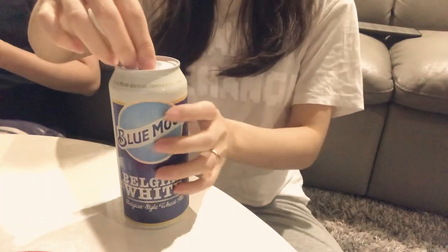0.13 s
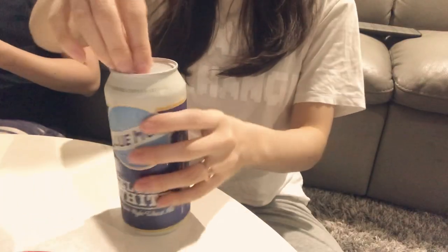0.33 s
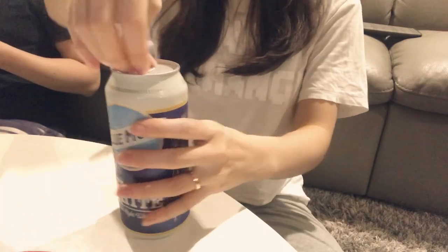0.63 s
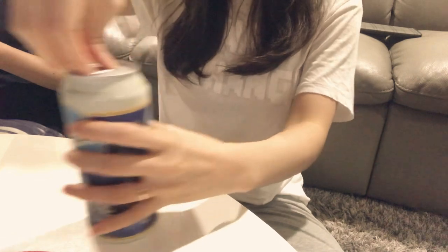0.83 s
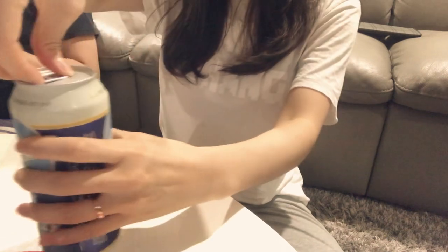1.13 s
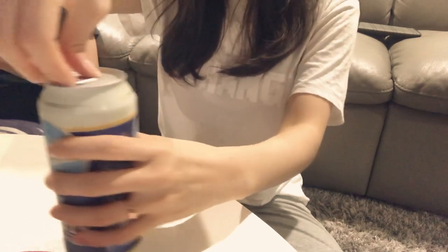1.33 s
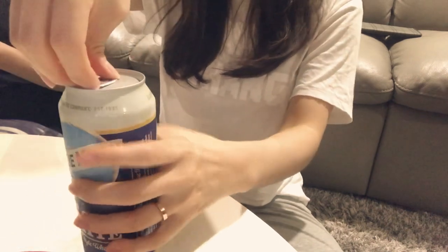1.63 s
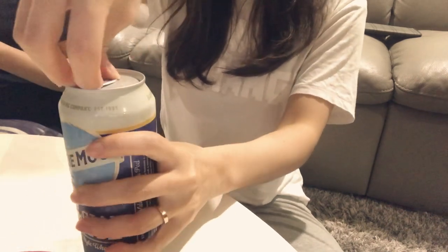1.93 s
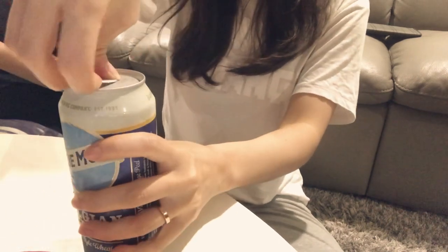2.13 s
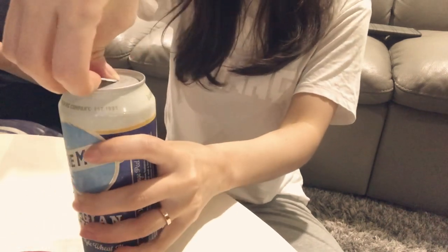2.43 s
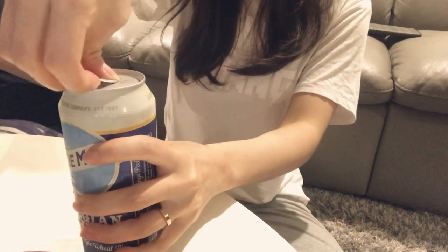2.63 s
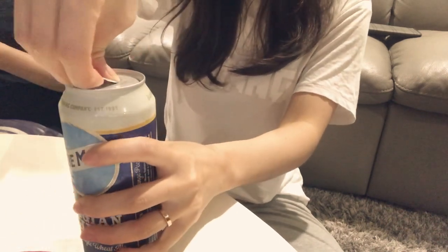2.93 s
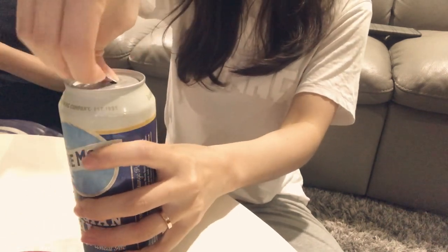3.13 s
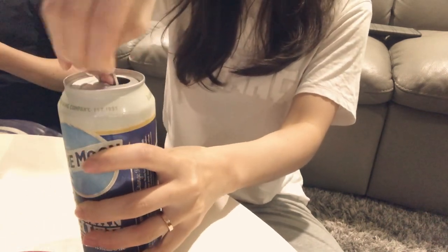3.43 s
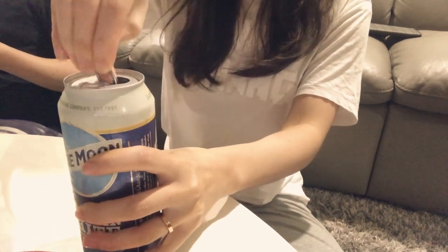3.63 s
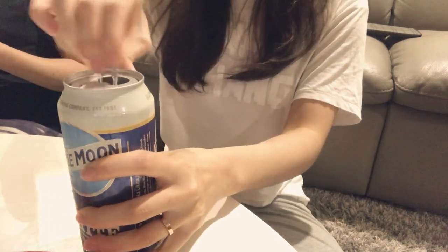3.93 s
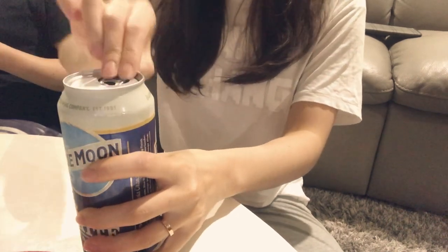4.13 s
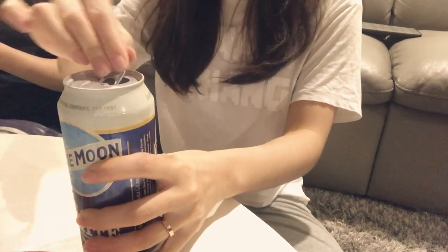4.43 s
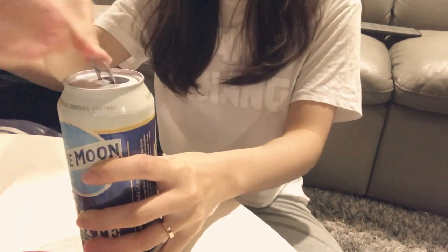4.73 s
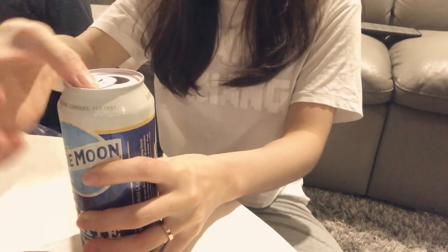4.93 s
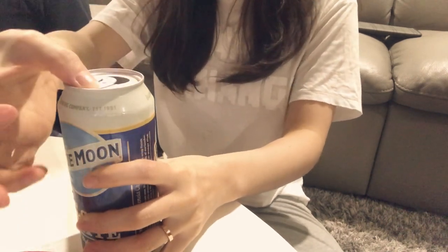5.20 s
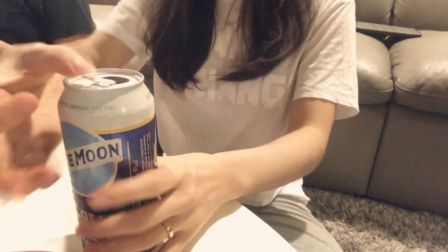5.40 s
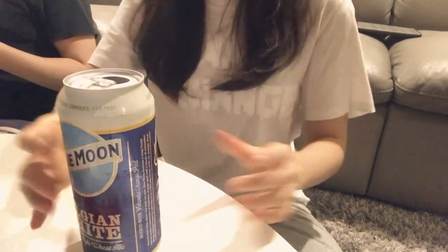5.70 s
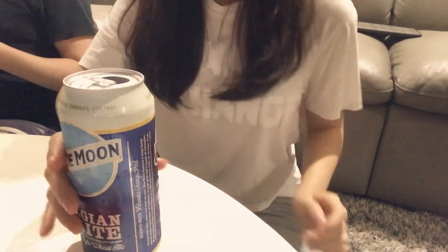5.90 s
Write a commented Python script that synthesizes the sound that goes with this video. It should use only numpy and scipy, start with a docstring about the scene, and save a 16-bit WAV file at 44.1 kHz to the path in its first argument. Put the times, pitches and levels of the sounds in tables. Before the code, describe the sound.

A full metal drink can knocks and slides on a table, its lid cracks, gas hisses briefly, then it tears open with a ringing metallic pop.

```python
"""A can scrapes and knocks on a table, is handled, and is then opened close by in a quiet living room.
The stiff lid cracks and sings, and gas hisses through the slit as noise shaped by a bright jet spectrum.
The flap tears open and the thin shell rings as damped modes; then the flap scrapes down inside.
The tab ticks and creaks as it is folded back, and skin rubs the can as the hands let go.
Blows excite resonant bodies, friction is a train of tiny slips, and walls add a tail of dense modes."""
import sys
import numpy as np
from scipy import signal
from scipy.io import wavfile
from scipy.ndimage import uniform_filter1d

SR = 44100
rng = np.random.default_rng(int(sys.argv[2]) if len(sys.argv) > 2 else 0)


def store_wav(level_fs):
    """Save 16-bit WAV to argv[1]."""
    pcm = np.round(np.clip(np.atleast_2d(level_fs), -1, 1) * 32767)
    wavfile.write(sys.argv[1], SR, pcm.T.astype(np.int16))


N = 267246
T = np.arange(N) / SR  # time axis, s
HZ = np.fft.rfftfreq(4096, 1 / SR)  # frequency grid of all filters, Hz

# The lid snapping and tearing, which also jolts the can.
# Each row: start in seconds, level in dB, favoured pitch in Hz, bass shelf in dB, treble shelf in dB.
LID_SNAPS = [(2.2897, -17.7, 4464, -5, -0.5), (2.6356, -16, 4670, -6, -7), (2.7447, -22, 2602, 6.5, -8.5),
             (2.7454, -19.5, 4190, 8, -10.5), (3.1696, -50, 4090, 1, -1), (3.1833, -18.5, 10500, -1, 0.5),
             (3.346, -30, 5766, 1.5, -0.5), (3.3512, -28, 4430, 2, -2.5), (3.3606, -39.5, 4400, 1, -2),
             (3.3723, -21.5, 5900, -0.5, -4.5), (3.3801, -17, 6210, 2, 1), (3.3927, -25, 3040, 4.5, 1.5),
             (3.3944, -12.7, 1200, 7.5, -9)]


def amp(db):
    """Level is logarithmic: decibels to linear gain."""
    return 10 ** (np.asarray(db) / 20)


def unit(x):
    """Mean power sets the level: scales a signal to rms 1."""
    return x / np.sqrt(np.mean(x ** 2) + 1e-20)


def read(points, hz):
    """Pitch is logarithmic: interpolates a table along a log-frequency axis."""
    point_hz, value = np.transpose(points)
    return np.interp(np.log(hz + 1), np.log(point_hz + 1), value)


def add(mix, s, sound):
    """Superposition: sounds sum linearly, here from s seconds on."""
    part = mix[round(s * SR):][:len(sound)]
    part += sound[:len(part)]


def colour(x, db):
    """Causal resonance: a minimum-phase filter with the gain db on the grid HZ."""
    log_gain = np.log(amp(np.maximum(db, db.max() - 100)))
    both_sides = np.r_[log_gain, log_gain[-2:0:-1]]
    # the phase of a minimum-phase filter is the Hilbert transform of its log gain
    response = np.exp(np.conj(signal.hilbert(both_sides)))
    taps = np.fft.ifft(response).real
    return signal.oaconvolve(x, taps)[:len(x)]


def bump(hz, width):
    """Selective emphasis: a bell of height 1 on the grid HZ, falling to 1/e at width octaves."""
    return np.exp(-(np.log2((HZ + 1) / hz) / width) ** 2)


def peaks_db(resonances):
    """Resonance: sums humps on the grid HZ; rows hold Hz, width at half height in Hz, height in dB."""
    return sum(db / (1 + (2 * (HZ - hz) / width) ** 2) for hz, width, db in resonances)


def ring(modes, t):
    """Modal synthesis: damped sines of a struck body; successive modes start in opposite directions."""
    out = 0
    for k, (hz, db, t60) in enumerate(modes):
        decay = amp(db - 60 * t / t60)
        out = out + (-1) ** k * decay * np.sin(2 * np.pi * hz * t)
    return out


def dying_noise(spectrum_db, t60s):
    """High modal density sounds like noise: one second of it, each band fading at its own rate."""
    noise = unit(colour(rng.standard_normal(SR), spectrum_db))
    hz, t, bands = signal.stft(noise, SR, nperseg=256)
    fade = amp(-60 * t / read(t60s, hz)[:, None])
    return signal.istft(bands * fade, SR, nperseg=256)[1][:SR]


def envelope(start, rise_s, hold_s, fade_db_per_s):
    """Exponential decay: rises from start, holds until hold_s after it, then fades evenly in dB."""
    t = T - start
    return np.clip(t / rise_s, 0, 1) * amp(-fade_db_per_s * np.maximum(t - hold_s, 0))


def blow_force(t, t60, chatter):
    """Impact: an impulse, then a short noisy chatter of the contact that sets in a moment later."""
    onset = np.minimum(t / .0004, 1)
    force = rng.standard_normal(len(t)) * amp(-60 * t / max(t60, .002)) * onset
    force *= chatter / np.linalg.norm(force)
    force[0] += 1
    return force


def blows(rows, body, chatter, bass_hz, treble_hz, width):
    """Source and filter: each blow drives a body, and where it lands favours one pitch."""
    out = np.zeros(N)
    t = np.arange(len(body)) / SR
    for s, db, hz, pitch_db, bass_db, treble_db, t60 in rows:
        bass_shelf = bass_db / (1 + (HZ / bass_hz) ** 2)
        treble_shelf = treble_db / (1 + (treble_hz / (HZ + 1)) ** 6)
        struck = signal.fftconvolve(blow_force(t, t60, chatter), body)[:len(t)]
        sound = colour(struck, pitch_db * bump(hz, width) + bass_shelf + treble_shelf)
        # the level is the rms that the blow's whole energy would have within 10 ms
        add(out, s, amp(db) * sound / np.linalg.norm(sound) * np.sqrt(SR / 100))
    return out


def friction(grain_db, slips_per_s):
    """Stick-slip: countless tiny slips at random moments, of uneven size."""
    size = amp(grain_db * np.minimum(rng.exponential(1, N), 4))
    slips = rng.random(N) < slips_per_s / SR
    return unit(rng.standard_normal(N) * size * slips)


def strokes(rows):
    """Friction grows with speed: each stroke (start s, length s, peak dB) follows one arch of speed."""
    speed_power = .8  # loudness is this power of the speed
    loudness = 0
    for s, length, db in rows:
        speed = np.abs(np.sin(np.pi * np.clip((T - s) / length, 0, 1)))
        loudness = loudness + amp(db) * speed ** speed_power
    return loudness


def lid(chatter):
    """Brittle fracture: the stiff lid snaps each time the scored seam tears further."""
    # Broad spectrum that all snaps share. Each row: frequency in Hz, gain in dB.
    snap_spectrum = [(60, -42), (200, -24.5), (480, -12), (800, -16), (1030, -10), (1300, -6.5), (2100, -7),
                     (3000, -3), (6200, -2.5), (7300, -4), (11000, -6.5), (16000, -4)]
    # Short-lived modes. Each row: frequency in Hz, width in Hz, height in dB over the broad spectrum.
    snap_modes = [(507, 220, 6.5), (990, 76, 8), (2800, 240, 1), (3590, 560, 4), (4100, 200, 5.5),
                  (4375, 220, 4), (5850, 900, 5), (6380, 300, 1), (10900, 380, 5), (13180, 600, 1.5)]
    pitch_db = 6.5  # by which a snap favours its pitch
    tight_t60_s, loose_t60_s = .011, .024  # chatter lengthens from snap to snap as the flap comes loose
    body = colour(signal.unit_impulse(SR // 8), read(snap_spectrum, HZ) + peaks_db(snap_modes))
    t60s = np.geomspace(tight_t60_s, loose_t60_s, len(LID_SNAPS))
    rows = []
    for (s, db, hz, bass_db, treble_db), t60 in zip(LID_SNAPS, t60s):
        rows.append((s, db, hz, pitch_db, bass_db, treble_db, t60))
    return blows(rows, body, chatter, bass_hz=1300, treble_hz=7600, width=0.37)


def singing_lid():
    """Free vibration: after a snap a cluster of close modes of the stressed lid sings on."""
    # Each row: start in seconds, level at the start in dB, centre pitch in Hz, t60 in seconds.
    sung_notes = [(2.291, -49.5, 4100, 0.18), (2.638, -36.5, 3200, 0.35), (2.745, -36.5, 3960, .5),
                  (3.185, -44.5, 3500, 0.13)]
    out = np.zeros(N)
    t = np.arange(SR) / SR
    for s, db, hz, t60 in sung_notes:
        cluster = unit(colour(rng.standard_normal(SR), 32 * bump(hz, width=0.2)))
        add(out, s, cluster * amp(db - 60 * t / t60))
    return out


def opened_can():
    """Shell vibration: the flap gives way, the thin shell rings and crackles, the flap scrapes inside."""
    # Clear modes of the open can. Each row: frequency in Hz, relative level in dB, t60 in seconds.
    can_modes = [(376, -6.5, 0.35), (1116, -1, 0.16), (1210, -3, 0.43), (1744, -8.5, 0.44),
                 (2450, -2.5, .3), (2540, -1, .3), (3050, -1, 0.29), (3160, -0.5, 0.34), (3085, -4.5, 0.24),
                 (3510, -1, 0.21), (5400, -6, .35), (6288, -5.5, .35), (6270, -8, 0.47), (7800, -4.5, 0.37)]
    # Dense higher modes. Each row: frequency in Hz, relative level in dB per Hz.
    shell_spectrum = [(80, -35), (300, -13.5), (700, -18.5), (1000, -8.5), (1220, -1), (1550, -12.5),
                      (2400, -1.5), (3200, 0), (4600, -12), (6200, -7), (8050, -12.5), (8500, -20),
                      (16000, -22)]
    # Their decay. Each row: frequency in Hz, t60 in seconds.
    shell_t60 = [(200, 0.34), (1200, 0.5), (3000, 0.39), (7500, .42), (9000, 0.33), (16000, .24)]
    # The push through the table. Each row: frequency in Hz, level in dB, t60 in seconds.
    thud_modes = [(85, -37.5, .07)]
    pop_s, dense_db, modes_db = 3.3955, -21.5, -29.5
    crackle_db, crackles_per_s, crackle_rise_s, crackle_fade_db_per_s = -28, 500, .01, 150
    flap_s, flap_db, flap_rise_s, flap_hold_s, flap_fade_db_per_s = 3.57, -44, 0.034, 0.068, 131

    t = np.arange(SR) / SR
    out = np.zeros(N)
    shell_db = read(shell_spectrum, HZ)
    modes = ring(can_modes, t)
    modes = modes / modes[:SR // 50].std()  # the level holds for the first 20 ms
    add(out, pop_s, amp(dense_db) * dying_noise(shell_db, shell_t60) + amp(modes_db) * modes)
    add(out, pop_s, ring(thud_modes, t))

    tear = amp(crackle_db) * envelope(pop_s, crackle_rise_s, 0, crackle_fade_db_per_s)
    crackle = unit(colour(friction(grain_db=5, slips_per_s=crackles_per_s), shell_db))
    dull_db = -6 * np.log2(1 + (HZ / 5000) ** 2)  # the scrape is duller than the ringing shell
    scrape = amp(flap_db) * envelope(flap_s, flap_rise_s, flap_hold_s, flap_fade_db_per_s)
    scraping = unit(colour(friction(grain_db=1.0, slips_per_s=3100), shell_db + dull_db))
    return out + tear * crackle + scrape * scraping


def gas():
    """Jet turbulence: bright noise, fluttering slightly, grows as the slit widens and fades with pressure."""
    # Spectrum of the jet. Each row: frequency in Hz, relative level in dB.
    jet_spectrum = [(500, -39), (1000, -26), (2300, -18), (3700, -10), (5900, -2.5), (7200, -6), (8000, 1),
                    (8350, -5.5), (9200, 1.5), (10400, -7), (11500, 1), (12700, -4.5), (13700, 0),
                    (14500, -3), (15600, -1)]
    # A new spurt joins each time the slit widens. Each row: start in seconds, level before sagging in dB.
    spurts = [(2.342, -30), (2.41, -28.5), (2.748, -35)]
    spurt_rise_s, sag_db_per_s = .012, 37  # opens quickly, then sags with the pressure
    empty_s, empty_db_per_s = 2.836, 370  # the pressure is spent and the hiss dies
    power = 0  # independent spurts add in power
    for s, db in spurts:
        power = power + (amp(db) * envelope(s, spurt_rise_s, 0, sag_db_per_s)) ** 2
    flow = np.sqrt(power)
    pressure = amp(-empty_db_per_s * np.maximum(T - empty_s, 0))
    flutter = unit(uniform_filter1d(rng.standard_normal(N), size=300))
    hiss = unit(colour(rng.standard_normal(N), read(jet_spectrum, HZ)))
    return flow * pressure * hiss * amp(.6 * flutter)


def tab(chatter):
    """Impact and stick-slip: fingers, flap and tab tick on the lid, the sliding can judders with a tick, and
    the tab creaks on its rivet."""
    # Modes of the tab on the lid. Each row: frequency in Hz, relative level in dB, t60 in seconds.
    tab_modes = [(1405, 1.5, 0.013), (1725, -1, 0.0053), (2970, -3.5, 0.0059), (3956, -4.5, 0.0063),
                 (4580, -5, 0.006), (5780, -4, .005), (8720, -12, 0.0038)]
    # Ticks. Each row: start in seconds, level in dB, favoured pitch in Hz, treble shelf in dB,
    # t60 of the chatter in seconds.
    tick_rows = [(1.379, -51.5, 2300, -5, .02), (1.5505, -61.5, 2200, 6, .03),
                 (2.111, -63.5, 13800, 3, .008), (3.652, -45, 1250, -10, 0.038),
                 (3.919, -42.5, 4430, 5.5, 0.033), (3.933, -42, 5950, 5, .058),
                 (3.946, -44, 3020, 6, 0.031), (3.9683, -48.5, 2800, -10, 0.064),
                 (4.1566, -51, 2400, 5, 0.012), (4.238, -65, 1300, -9, .01),
                 (4.345, -59.5, 1330, -8, 0.0079), (4.563, -51, 1380, -25, 0.0067),
                 (4.603, -57, 3020, 4, 0.054), (4.927, -42.5, 4400, 1, 0.009),
                 (5.443, -46.5, 2970, 4, 0.026), (5.473, -51, 910, -7, .03), (5.493, -55, 7900, -2, 0.013)]
    # Creaks. Each row: start in seconds, length in seconds, peak level in dB.
    creak_strokes = [(1.82, 0.26, -71), (4.632, 0.02, -51), (4.651, 0.023, -46.5)]
    # a firm tick is broadband; the lighter it is, the more its pitch stands out
    firm_db, purity_db_per_db, bass_db = -34.5, 0.74, 3.5
    body = ring(tab_modes, np.arange(SR // 8) / SR)
    body[0] += 1.8  # the nail's contact
    rivet_db = 10 * bump(hz=3060, width=0.52) - 4 * np.log2(1 + (HZ / 7000) ** 4)
    slips = friction(grain_db=2, slips_per_s=2500)
    creak = unit(colour(signal.oaconvolve(slips, body)[:N], rivet_db))
    rows = []
    for s, db, hz, treble_db, t60 in tick_rows:
        rows.append((s, db, hz, purity_db_per_db * (firm_db - db), bass_db, treble_db, t60))
    ticks = blows(rows, body, chatter, bass_hz=920, treble_hz=5900, width=0.34)
    return ticks + strokes(creak_strokes) * creak


def knocks_on_table(body):
    """Impact and recoil: the can is set down, bumped by the hands and jolted by the snaps of its lid."""
    # Each row: start in seconds, level in dB, favoured pitch in Hz, t60 of the chatter in seconds.
    knock_rows = [(.402, -27.5, 640, 0.011), (.4105, -23, 380, 0.014), (.442, -31, 272, 0.0079),
                  (.877, -50.5, 720, .026), (1.1452, -24.5, 451, .014), (1.369, -45, 400, 0.027),
                  (1.403, -50, 228, 0.016), (1.642, -55, 162, 0.037), (2.872, -48, 553, .04),
                  (3.527, -46, 210, 0.049), (3.9385, -34.5, 563, 0.012), (3.953, -49.5, 171, .03),
                  (5.4735, -47, 850, 0.045), (5.57, -56.5, 64, .12)]
    recoil_db, recoil_hz, recoil_t60_s = -32, 230, .04  # level relative to the bass of the snap
    # the lower a knock's pitch lies below hard_hz, the more it stands out
    hard_hz, soft_db_per_octave, knock_bass_db, knock_treble_db = 979, 13, .5, -5
    recoils = [(s, db + bass_db + recoil_db, recoil_hz, recoil_t60_s) for s, db, _, bass_db, _ in LID_SNAPS]
    rows = []
    for s, db, hz, t60 in knock_rows + recoils:
        pitch_db = soft_db_per_octave * np.log2(hard_hz / hz)
        rows.append((s, db, hz, pitch_db, knock_bass_db, knock_treble_db, t60))
    return blows(rows, body, chatter=.8, bass_hz=885, treble_hz=4000, width=0.27)


def table():
    """Coupled bodies: base and table top ring at knocks and judders; sliding and skin rub as friction."""
    # Modes of base and table top. Each row: frequency in Hz, relative level in dB, t60 in seconds.
    table_modes = [(62, -33.5, .15), (142, -9.5, 0.12), (193, -11.5, 0.14), (265, -8.5, 0.14),
                   (399, -2.5, .08), (467.4, -3.5, 0.055), (624.3, -1.5, 0.062), (727, -6, 0.045),
                   (940, -12.5, 0.053), (1230, -10, 0.074), (1290, -11.5, .035), (1570, -2.5, 0.021),
                   (2420, -14, .016), (2980, -13, 0.026), (3540, -14.5, .007), (4700, -17, 0.0066),
                   (6024, -22, 0.0045), (7700, -28, .004)]
    # The can rubbed by table or skin. Each row: frequency in Hz, relative level in dB per Hz.
    scuff_spectrum = [(59, -32), (100, -37), (185, 1), (321, -4.5), (422, -0.5), (568, -8.5), (687, -11.5),
                      (849, -13.5), (1190, -7.5), (2020, -11.5), (2900, -11), (4720, -15.5), (10500, -25.5),
                      (15800, -26)]
    # Resonances that sliding wakes. Each row: frequency in Hz, width in Hz, relative strength in dB.
    scuff_resonances = [(188, 24, 5.5), (430, 49, -4), (682, 44, 8), (1190, 22, 0.5), (1580, 170, -28),
                        (2300, 150, -20), (2908, 70, 4), (3470, 200, -16), (6000, 330, -1.5),
                        (7840, 260, -2)]
    # The can slid over the table. Each row: start in seconds, length in seconds, peak level in dB.
    slides = [(.15, .18, -61), (.62, 0.46, -49), (1.11, .43, -53.5)]
    # Skin on the can as the fingers let go. Each row: start and length in seconds, peak level in dB.
    rubs = [(5.38, .2, -59)]
    judders_per_s, judder_db = 28, -10  # random jolts on the rim, level relative to the slide

    t = np.arange(SR // 3) / SR
    contact = t / .00006
    push = 3 * contact * np.exp(-contact)  # brief push of rim on table
    body = ring(table_modes, t) + push
    # strength becomes hump height: 9 dB for a strength of 0
    humps_db = peaks_db([(hz, width, 9 * amp(db / 2)) for hz, width, db in scuff_resonances])
    scuff_db = read(scuff_spectrum, HZ)
    drag = unit(colour(friction(grain_db=1.0, slips_per_s=7000), scuff_db + humps_db))
    skin = unit(colour(friction(grain_db=6.0, slips_per_s=4900), scuff_db))
    jolts = friction(grain_db=-1.5, slips_per_s=judders_per_s)
    judder = unit(signal.oaconvolve(jolts, body)[:N])
    sliding = strokes(slides) * (drag + amp(judder_db) * judder)
    return knocks_on_table(body) + sliding + strokes(rubs) * skin


def room(x):
    """Reverberation: a diffuse tail from the walls begins some milliseconds after the direct sound."""
    # Each row: frequency in Hz, reverberation time t60 in seconds.
    wall_t60 = [(150, .4), (1000, 0.34), (4000, .55), (8000, .42), (16000, 0.23)]
    # each pair: frequency in Hz, relative level in dB
    wall_colour = [(100, 1.8), (400, -0.3), (1200, 0.5), (4000, -2.6), (8000, -3.5), (15000, -1.5)]
    t = np.arange(SR) / SR
    tail = dying_noise(read(wall_colour, HZ), wall_t60)
    tail *= np.clip((t - .004) / 0.0054, 0, 1)  # silent for 4 ms, then swells in
    return signal.fftconvolve(x, tail / np.linalg.norm(tail))[:N]


def background():
    """Stationary noise and phase modulation: low air noise and a faint wavering hum."""
    # Air noise. Each row: frequency in Hz, relative level in dB per Hz.
    air_spectrum = [(15, -44.5), (28, -26), (53, 3), (82, -8.5), (113, -7.5), (170, -8.5), (228, -8),
                    (265, 0), (316, -9), (392, -6.5), (450, -16), (800, -14.5), (1250, -19.5),
                    (3900, -25.5), (7000, -28), (10000, -33.5), (15800, -33)]
    # Steady hum. Each row: frequency in Hz, rms level in dB.
    hum_tones = [(121, -70.5), (267, -74.5)]
    air_db = -63.5
    waver = unit(uniform_filter1d(rng.standard_normal((len(hum_tones), N)), size=9000, axis=1))
    hum = 0
    for (hz, db), wander in zip(hum_tones, waver):
        phase = 2 * np.pi * hz * T + 1.9 * wander
        hum = hum + amp(db) * np.sqrt(2) * np.sin(phase)
    air = unit(colour(rng.standard_normal(N), read(air_spectrum, HZ)))
    return amp(air_db) * air + hum


def scene():
    """Direct and diffuse field: all sources stand close in front, the same in both channels."""
    can, hiss, knocks = opened_can(), gas(), table()
    direct = lid(chatter=1.6) + singing_lid() + can + hiss + knocks + tab(chatter=1.4)
    # the walls gather a click from all directions, which evens out the colour of its chatter
    even_snaps, even_ticks = lid(chatter=.3), tab(chatter=.3)
    to_walls = amp(-15.5) * even_snaps + amp(-14.5) * hiss + amp(-15) * can
    to_walls = to_walls + amp(-17) * knocks + amp(-18.0) * even_ticks
    mono = direct + room(to_walls) + background()
    return np.array([mono, mono])


def record(dry):
    """Saturation and band limit: peaks beyond full scale are clipped, then the highest treble is cut."""
    edge_hz = 15950
    low_pass = signal.firwin(401, edge_hz, window=("kaiser", 8), fs=SR)
    return signal.oaconvolve(np.clip(dry, -1, 1), low_pass[None], "same")


dry = scene()
out = record(dry)
store_wav(out)
```